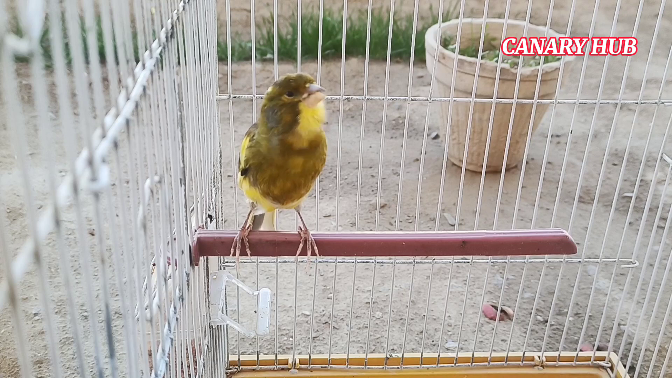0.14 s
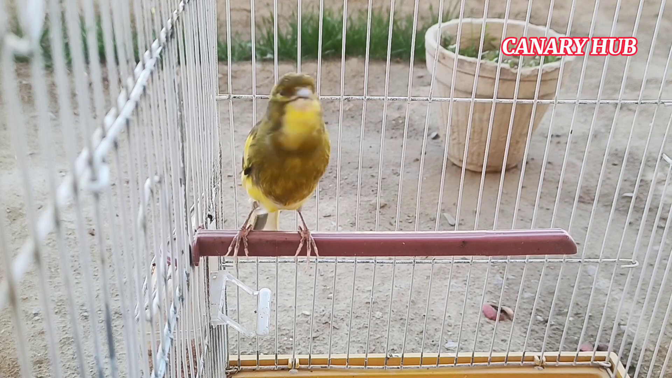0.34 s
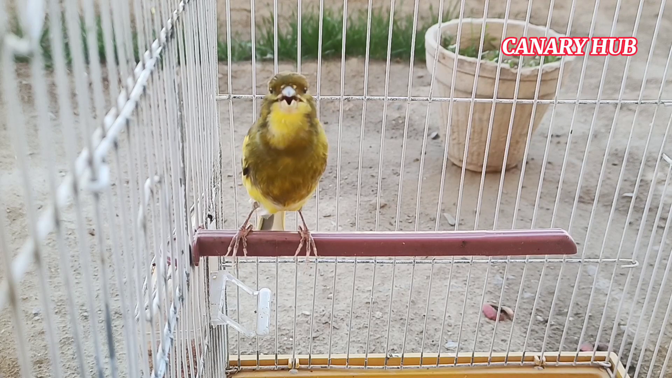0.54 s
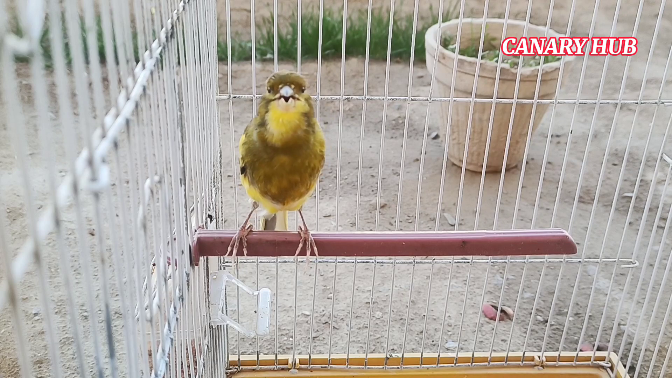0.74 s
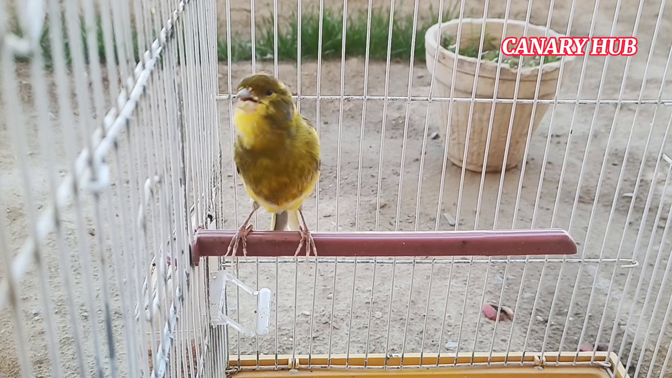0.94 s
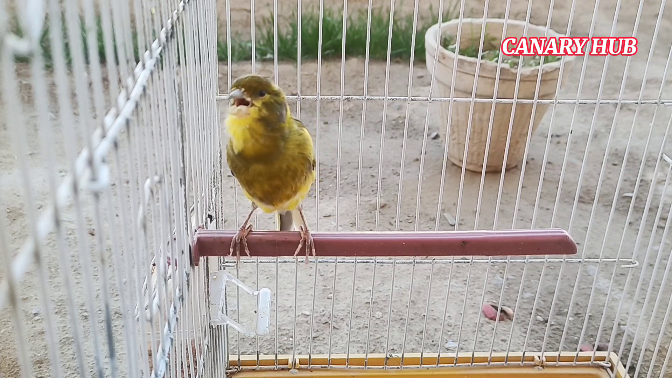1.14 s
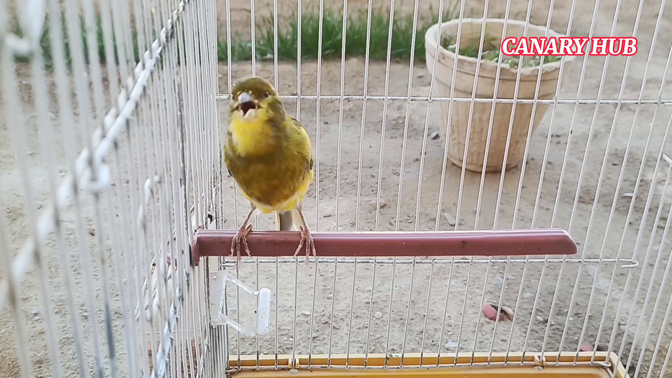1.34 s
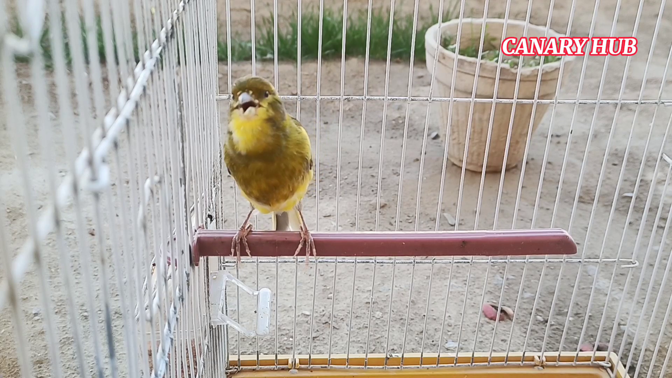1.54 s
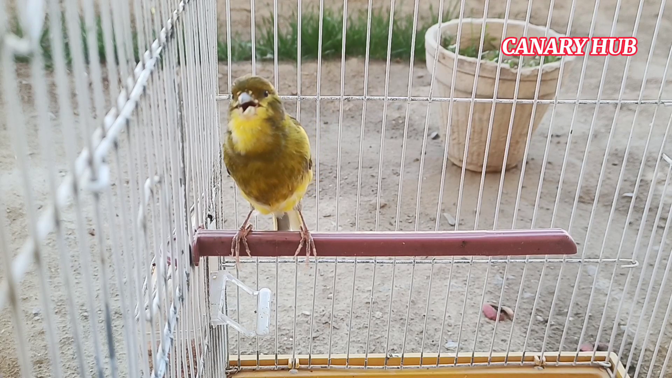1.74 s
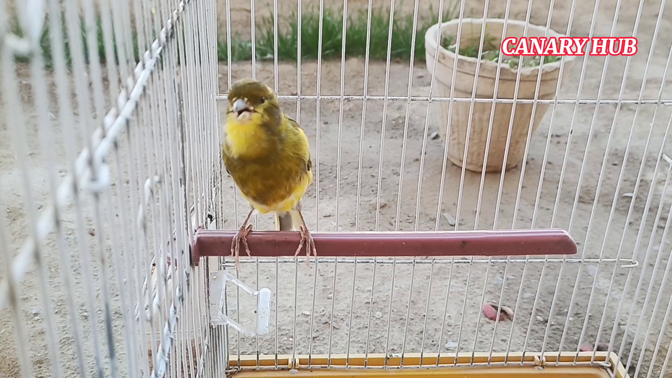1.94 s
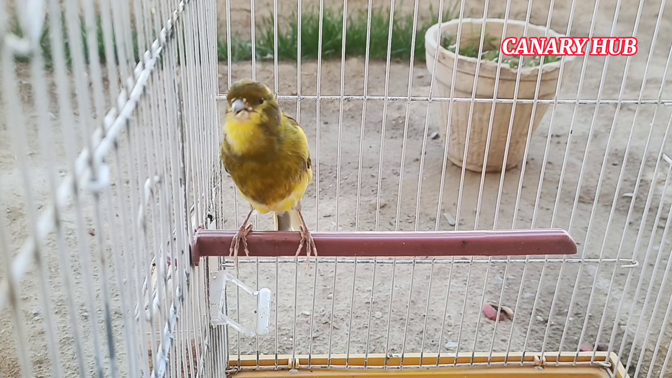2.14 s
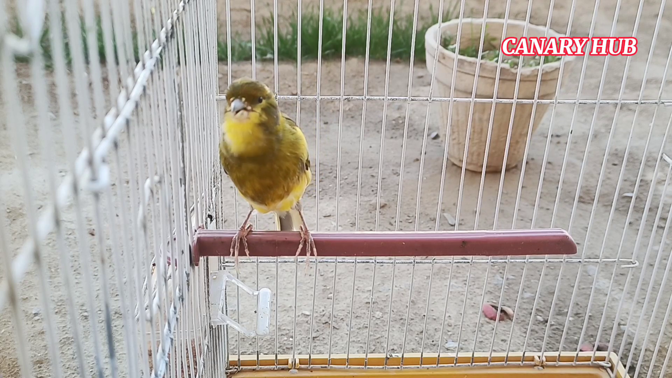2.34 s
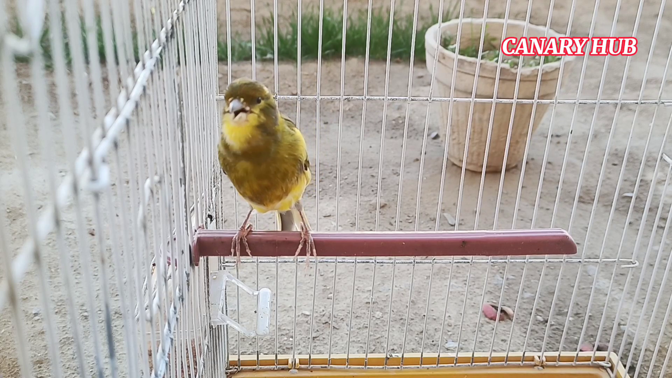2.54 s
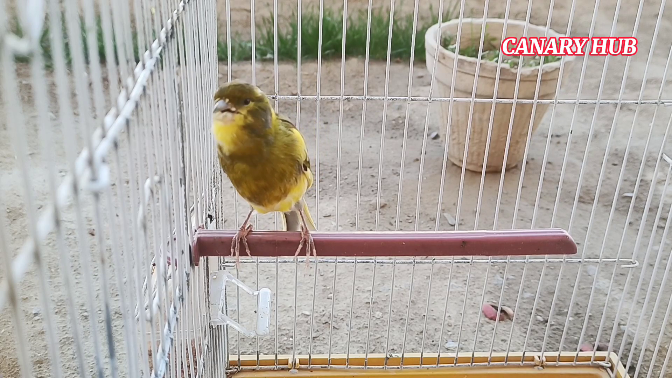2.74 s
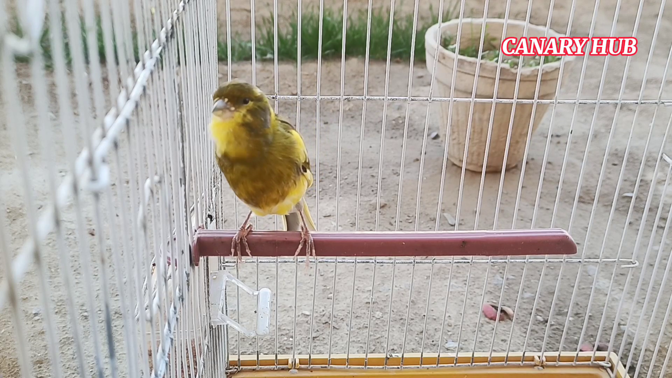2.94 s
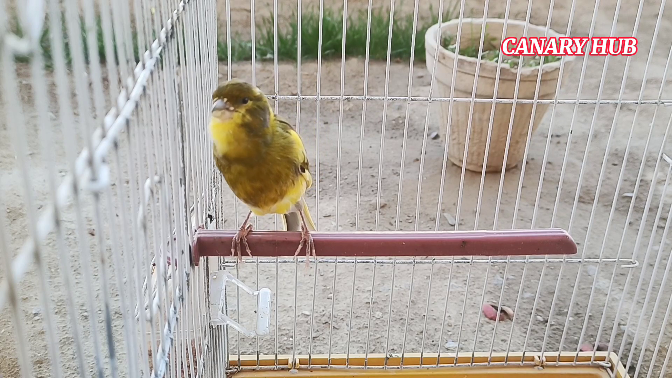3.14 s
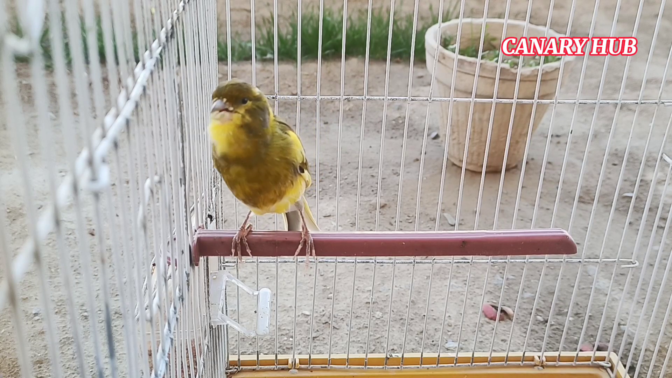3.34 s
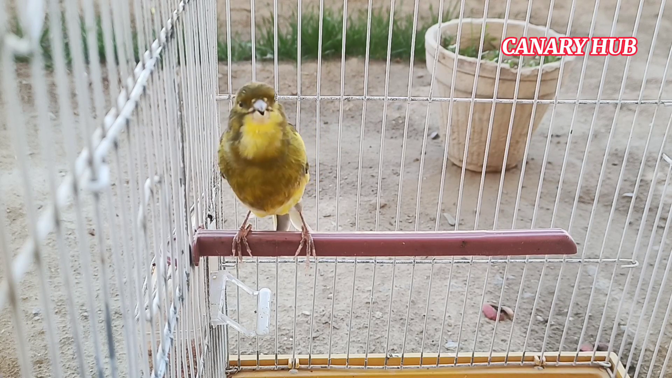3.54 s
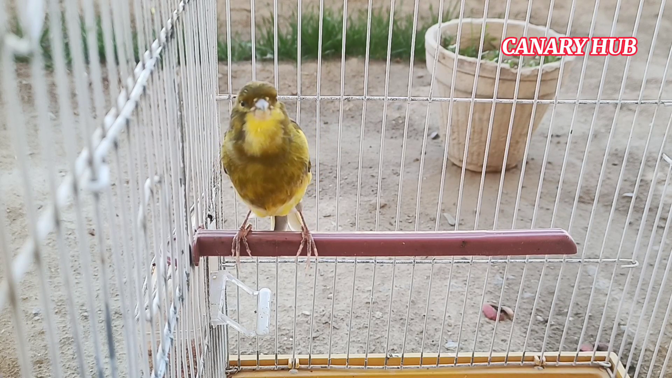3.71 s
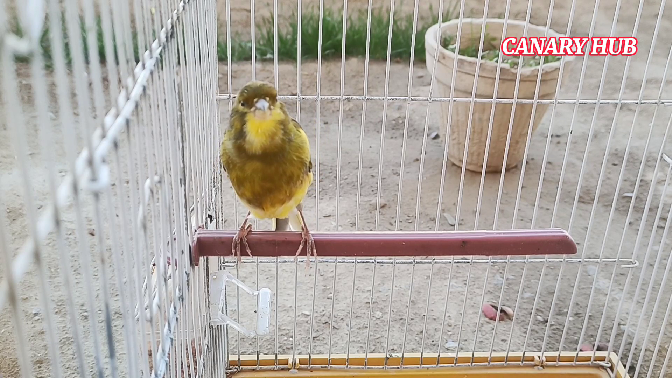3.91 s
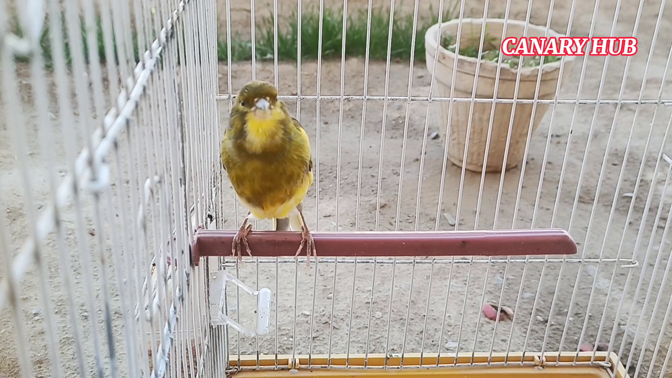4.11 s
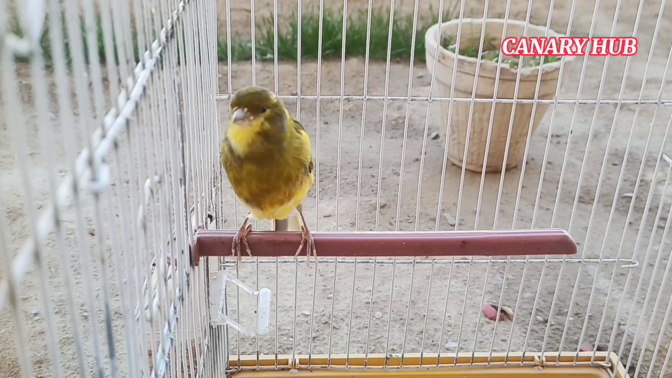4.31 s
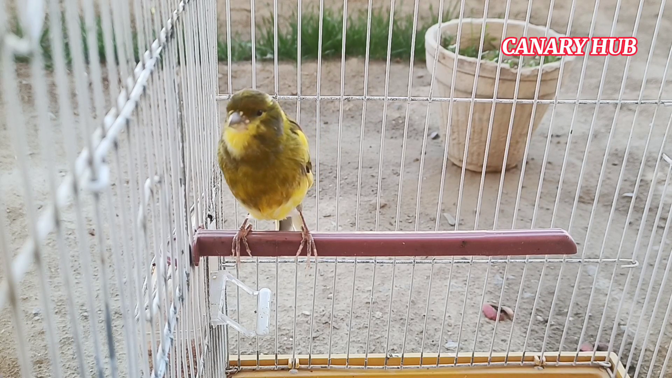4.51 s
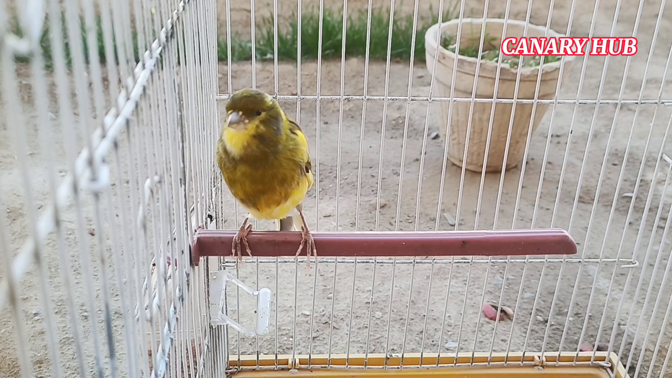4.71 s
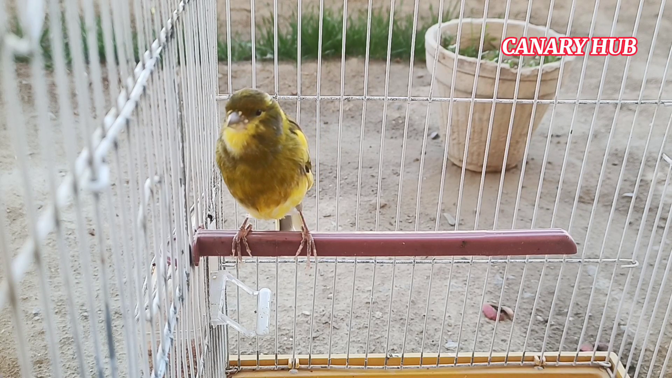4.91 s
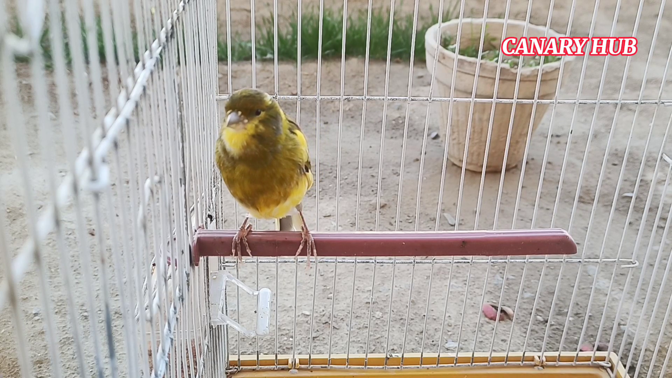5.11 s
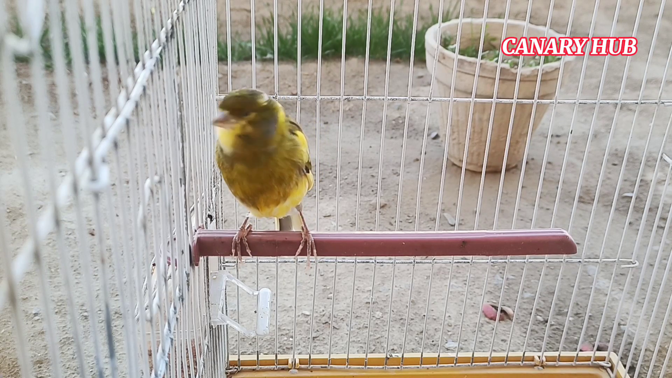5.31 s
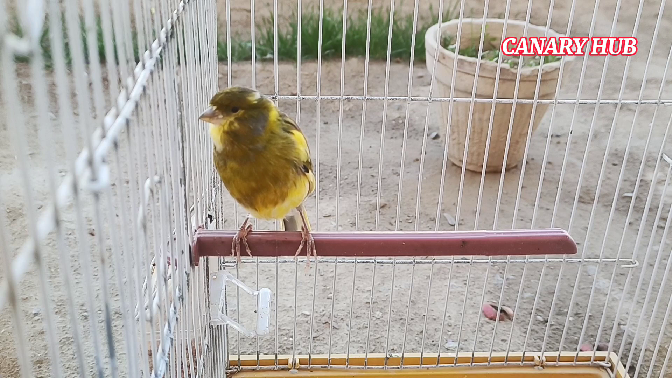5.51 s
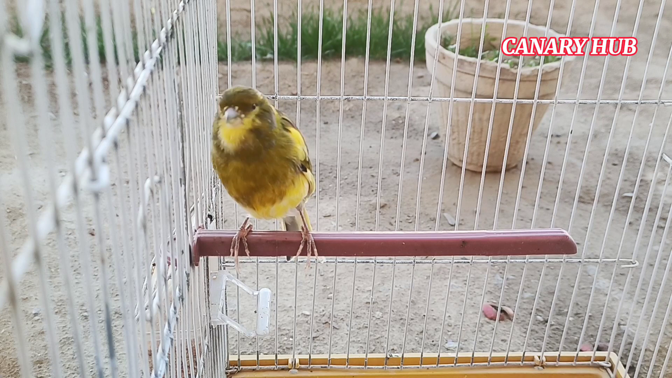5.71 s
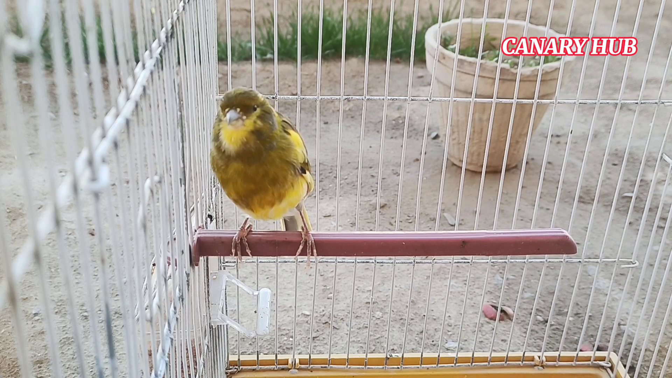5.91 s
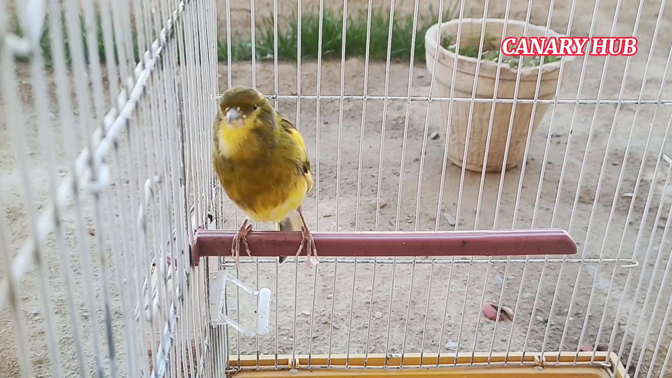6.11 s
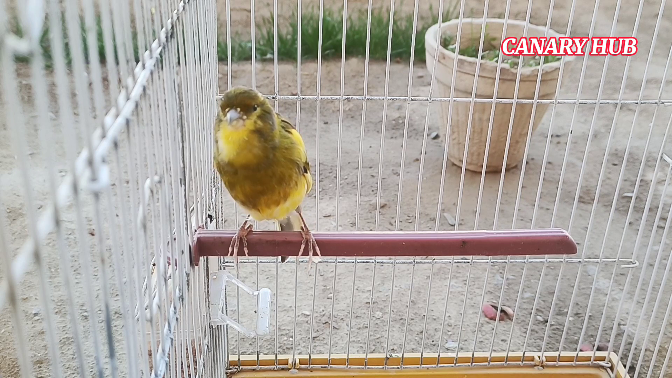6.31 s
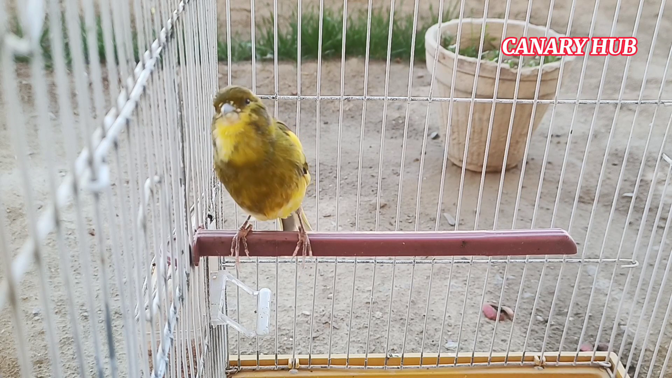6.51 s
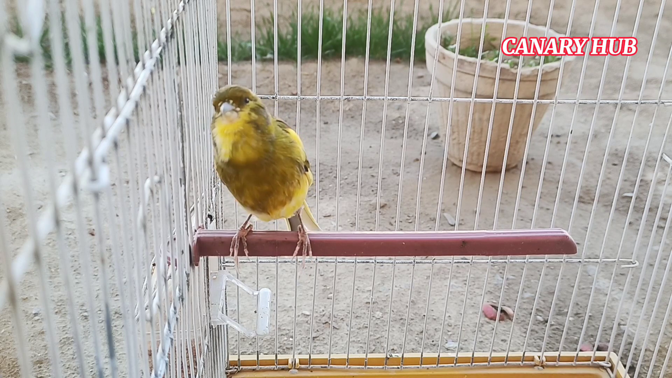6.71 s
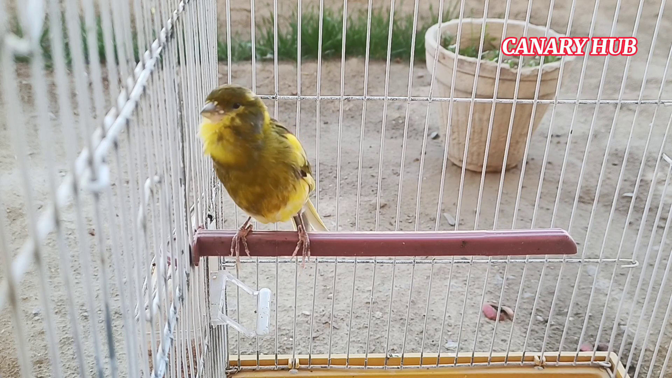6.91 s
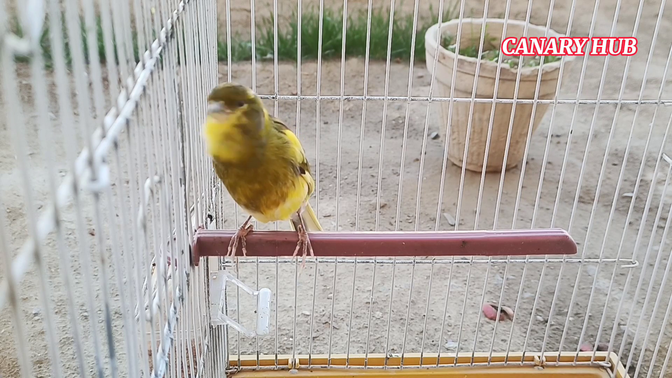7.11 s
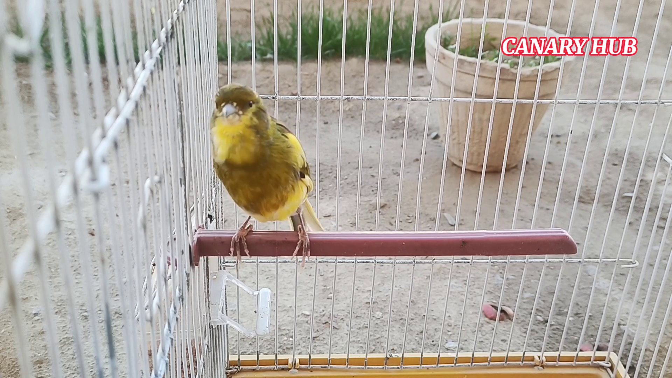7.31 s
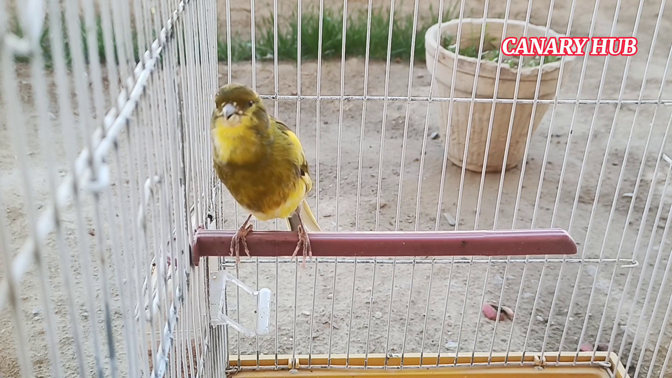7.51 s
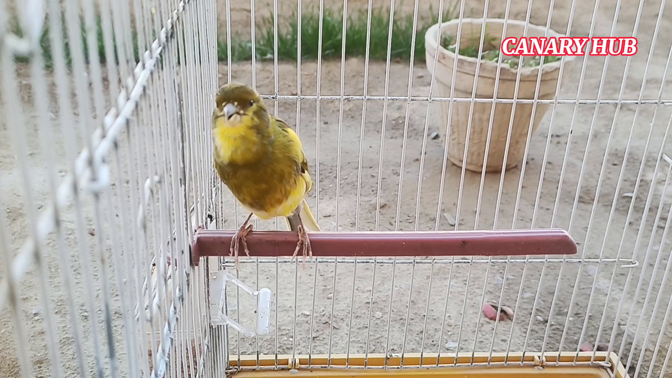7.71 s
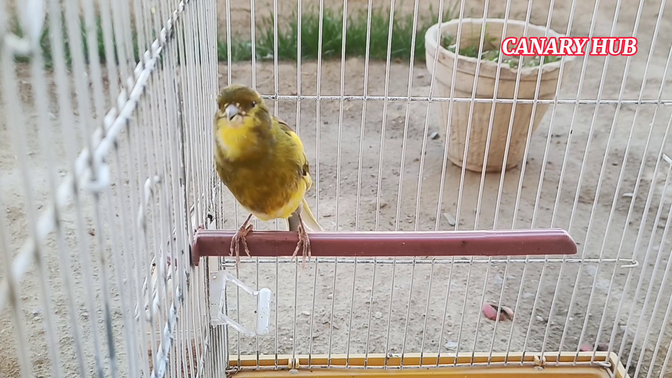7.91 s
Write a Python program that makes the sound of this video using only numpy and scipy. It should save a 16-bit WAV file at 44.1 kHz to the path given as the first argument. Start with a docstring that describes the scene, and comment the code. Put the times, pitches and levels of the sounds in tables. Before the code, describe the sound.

A caged canary sings loudly and close by in a yard with a soft echo, over a quiet, steady rumble of distant traffic. It opens with ten quick falling chirps, then four longer, high descending whistles from about 0.6 to 1.6 seconds. A run of short hooked notes follows, turning into wide upward sweeps from 2.3 to 2.9 seconds. A very fast trill of rising flicks lasts from 3.1 to 3.8 seconds. The canary then pauses, leaving the traffic and a far engine's low drone. Around 4.7 to 5 seconds a distant bird gives one faint buzzy call and four small chips, and the cage rustles very softly at about 5.6 seconds. At 6.2 seconds the canary starts a long, even trill that quickly grows loud and ends with one short, slightly sagging note near 7.9 seconds.

```python
"""A caged canary sings close by in a yard, over the steady rumble of distant traffic.
It opens with falling slurs and long whistles, then hooks, a rise, sweeps and a trill of quick flicks.
In the pause a far bird calls and the cage rustles; then the canary ends with a long trill and a sigh.
Each note is an almost pure gliding tone from the bird's voice box (the syrinx). A close reflection
weakens some of its pitches, and the yard adds a soft echo."""
import sys
import numpy as np
from scipy import signal
from scipy.fft import rfft, irfft, next_fast_len
from scipy.io import wavfile
from scipy.ndimage import uniform_filter1d, minimum_filter1d, map_coordinates

SR = 44100
rng = np.random.default_rng(int(sys.argv[2]) if len(sys.argv) > 2 else 0)


def inscribe(sig):
    """Save sig as 16-bit PCM at rate SR to the path in sys.argv[1].

    A 1-D sig is mono; a 2-D sig holds one channel per row.
    Samples are clipped to [-1, 1] before scaling.
    """
    pcm = np.round(np.clip(np.atleast_2d(sig).T, -1, 1) * 32767)
    wavfile.write(sys.argv[1], SR, pcm.astype(np.int16))


N = 350595
TIME = np.arange(N) / SR

# how the distant traffic swells and fades: (time [s], rumble level [dB], tyre level [dB])
TRAFFIC_LEVELS = [(0, -39, -46), (.6, -39, -48), (1.2, -46, -50), (2.1, -37, -49), (3.1, -36.5, -48.5),
                  (3.9, -40, -47.5), (5.2, -37.5, -46.5), (6.4, -40.5, -46.5), (7.1, -36, -44.5),
                  (7.95, -40, -45.5)]
# the tone colour of each sound, from low to high: (frequency [Hz], relative level [dB])
RUMBLE_COLOUR = [(15, -56), (25, -23.5), (56, -5), (130, 6), (149, 3), (199, -5), (237, -7), (263, -17),
                 (332, -13), (360, -15.5), (400, -23.5), (520, -43.5), (880, -120)]
TYRE_COLOUR = [(150, -31.5), (250, -3.5), (335, -7.5), (370, -15.5), (434, -8), (544, -14.5), (809, -11),
               (961, -15), (1950, -19.5), (3060, -27.5), (4800, -31), (6800, -34.5), (7700, -54),
               (16000, -66)]
EXHAUST_COLOUR = [(45, -13), (100, -4), (145, -1.5), (200, -5.5), (290, -4), (400, -10), (520, -8.5),
                  (650, -22)]
RUSTLE_COLOUR = [(1000, -20), (2500, 4), (4500, -6), (6500, 6), (8000, -17), (15000, -24)]
MIC_HISS_COLOUR = [(1000, -10), (13500, -11), (14700, -2), (15500, 0), (16500, -2.5)]
NOTE_HISS_COLOUR = [(1000, -26), (2500, 0.5), (5000, 6), (7000, 2), (9000, -12), (12500, -12), (15200, -3),
                    (16500, -10)]   # a faint high hiss on the notes, strongest on fast glides
OVERTONE_COLOUR = [(4000, 2.5), (7000, 9.5), (8500, -1.5), (11000, -2), (12500, -7.5), (14000, 2.5),
                   (15400, 8.5), (16500, 3)]   # how well the birds' overtones carry
# a far whine comes and goes: (time [s], level [dB])
WHINE_LEVELS = [(0, -72), (3.0, -66.5), (3.3, -50), (4.1, -46), (4.5, -59), (7.95, -60)]
WHINE_HZ, WHINE_WIDTH_HZ = 804, 90
# a far engine: (time [s], firing rate [Hz], level [dB])
ENGINE_RUN = [(0, 43, -56), (1.2, 41, -57.5), (2.1, 47, -49.5), (4.7, 48.5, -44), (6.3, 47.5, -45),
              (7.95, 48, -47)]
# a brief hum from far off: (peak time [s], half-width [s], pitch [Hz], level [dB])
LOW_HUMS = [(2.095, 0.026, 385, -37.5)]
# faint rustles in the cage: (peak time [s], half-width [s], level [dB])
RUSTLES = [(5.59, 0.023, -59), (5.665, 0.017, -54.5)]
# the background dips briefly after a phrase: (time [s], depth [dB], recovery time [s])
LULLS = [(.617, -10, .05), (.836, -4.5, .05), (1.095, -5, .05), (1.345, -3, .05), (2.238, -8, .07),
         (2.897, -12.5, .07), (3.838, -9, .06)]

# the overtones of each voice: (multiple of the pitch, relative level [dB])
FAR_CALL_OVERTONES = [(2, -4.5), (3, -33)]
FAR_CHIP_OVERTONES = [(2, -33.5)]
CANARY_OVERTONES = [(2, -43.5), (3, -40.5), (4, -44.5)]
# note shapes: (share of the note's length [0-1], pitch [Hz], relative level [dB])
FAR_CALL_SHAPE = [(0, 2864, -12), (.15, 2986, 0), (.45, 3124, 2.5), (.7, 3320, -2.5), (.86, 3220, -5),
                  (1, 2700, -14)]   # a low arch
FAR_CHIP_SHAPE = [(0, 3180, -21), (.25, 4100, -4), (.5, 4320, 0), (.75, 4050, -6.5), (1, 3340, -18)]   # a steeper arch
THIN_SHAPE = [(0, 4730, -13.5), (.2, 4680, -2), (1, 4630, -16)]   # sinks slightly
HOOK_SHAPE = [(0, 3650, -30), (.07, 4100, -6), (.2, 4580, -3), (.4, 5020, -6.5), (.62, 5250, -10),
              (.79, 5400, -11), (.87, 5000, -.5), (.94, 4640, -9), (1, 4700, -30)]   # rises, crests and snaps down
RISE_SHAPE = [(0.0, 3690, -34.5), (0.06, 3850.0, -12), (0.2, 4650, -10.5), (0.33, 4910.0, -10.5),
              (0.45, 6090.0, -27.5), (0.61, 6910.0, -18.5), (0.82, 7010.0, -5.5), (0.94, 7440.0, -17),
              (1.0, 7460.0, -26.5)]   # climbs an octave
SWEEP_SHAPE = [(0, 2150, -24), (.06, 2980, -13), (.15, 3830, -2.5), (.26, 4470, -7), (.48, 5120, -14),
               (.61, 5900, -7), (.8, 6150, -4), (.92, 6350, -6), (1, 6480, -22)]   # climbs an octave and a half
FLICK_SHAPE = [(0, 1900, -35), (.15, 2500, -27), (.3, 3450, -11), (.46, 3770, -5), (.61, 4320, -1),
               (.75, 4830, -8), (.88, 4940, -2), (1, 4940, -27)]   # shoots up and catches at its top
SIGH_SHAPE = [(0.0, 3000, -29), (0.14, 3490, -20), (0.32, 3586, -9.5), (0.5, 3420.0, -9),
              (0.71, 3280.0, -8), (1.0, 3370, -16)]   # lifts, then sags
# when those shapes are sung: (start [s], length [s], pitch factor, level [dB])
FAR_CHIPS = [(4.816, 0.024, 0.9, -36.5), (4.889, 0.026, 1.0, -35.5), (4.958, .027, .98, -34),
             (5.03, 0.025, 1, -36.5)]
THIN_NOTES = [(6.187, .075, 0.98, -52), (7.49, 0.48, .905, -45.5)]
FAR_CALL_NOTE = (4.697, 0.093, 1.0, -38)
RISE_NOTE = (2.2933, 0.07, 1.0, -11)
SIGH_NOTE = (7.887, 0.0516, 1.003, -1)

# the canary's falling slurs: (start [s], length [s], end pitch [Hz], level [dB])
SLURS = [(-0.031, .034, 2980, -6), (.0307, .034, 3020, -7.5), (.0953, .034, 3020, -7.5),
         (.1585, .034, 3020, -7), (.2225, .035, 3010, -7), (.2888, .034, 3000, -7),
         (.3535, .034, 2980, -6.5), (.4165, .034, 2900, -6.5), (.4825, .034, 2860, -6.5),
         (.552, .04, 3280, -10)]
SLUR_TOP_HZ, SLUR_FALL_SHARE = 4790, .9   # the pitch rests once it has fallen
# its long whistles: (start [s], length [s], settled pitch [Hz], settling time [s])
WHISTLES = [(.6325, .17, 4440, .041), (.8605, .2, 4310, .0523), (1.1251, .207, 4214, .0529),
            (1.3935, .169, 3990, .061)]
WHISTLE_TOP_HZ, WHISTLE_DB = 8000, -7
# its hooks: (start [s], length [s], level [dB], extra lift at the crest [Hz])
HOOKS = [(1.6405, .049, -13, 600), (1.7178, .0462, -8, 1300), (1.7872, .0487, -7, 1400),
         (1.86, .0481, -6, 750), (1.9374, .047, -6, 600), (2.012, .048, -4, 150), (2.0872, .049, -7.5, 200),
         (2.1585, .047, -9, 650)]
# its sweeps: (start [s], length [s], level [dB], upturn at the end [Hz])
SWEEPS = [(2.3795, .066, -8, 900), (2.4643, .069, -8.5, 900), (2.5506, .064, -7, 800),
          (2.6338, .068, -7, 800), (2.7204, .064, -7, 800), (2.8033, .063, -9, 100)]
# its first trill, made of flicks: (start [s], level [dB])
FLICKS = [(3.0806, -13.1), (3.1284, -8.6), (3.1718, -7.2), (3.2184, -6.5), (3.2676, -7.0), (3.3159, -6.6),
          (3.3647, -6.4), (3.414, -5.6), (3.464, -6.0), (3.5144, -5.8), (3.564, -5.8), (3.6147, -6.2),
          (3.6653, -6.3), (3.7173, -8.7), (3.7731, -8.4)]
FLICK_S, FLICK_UPTURN_HZ, FLICK_UPTURN_FADE_S = .033, 1100, .17
# its long trill: (start [s], level [dB])
TRILL_NOTES = [(6.2168, -25.5), (6.2922, -17.5), (6.3622, -14.2), (6.4311, -10.1), (6.4997, -11.8),
               (6.568, -10.4), (6.6361, -10.8), (6.7044, -8.6), (6.7736, -9.0), (6.8407, -8.4),
               (6.91, -9.0), (6.9789, -8.1), (7.0436, -10.1), (7.1091, -9.1), (7.1758, -9.7),
               (7.2417, -8.1), (7.309, -7.6), (7.3762, -7.9), (7.4414, -7.4), (7.5037, -7.5), (7.566, -7.7),
               (7.6273, -7.7), (7.6884, -8.0), (7.7491, -7.8), (7.8126, -8.5)]
TRILL_S, TRILL_LOW_HZ, TRILL_TOP_HZ = .046, 2050, 3815
TRILL_CLIMB_HZ_PER_S, TRILL_BEND_HZ = 82000, 260
# the close reflection's delay changes as the bird turns: (time [s], delay [ms])
REFLECTION_LAG = [(0, 1.4), (.6, 1.38), (1.4, 1.38), (1.64, 1.346), (2.8, 1.345), (3.1, 1.31), (7.9, 1.31)]
REFLECTION_SHARE = .56

HISSY_GLIDE_HZ_PER_S = 42000   # glides this fast carry the most hiss
OVERTONE_GROWTH = 0.45   # extra dB of overtones for each dB of loudness
LOW_OPENING_HZ = 3750   # below this pitch a trill note is in its low opening
ATTACK_CURVE = 1.5   # above 1: a note swells fast at first, then eases into its peak
PITCH_SCATTER = .005   # from one repeat of a note to the next
CUTOFF_HZ = 15900


def from_db(db):
    """Turn decibels into a factor to multiply by."""
    return 10 ** (np.asarray(db) / 20)


def rms_one(x):
    """Scale a sound so that its average power is 1."""
    return x / np.sqrt(np.mean(x ** 2) + 1e-20)


def in_time(rows):
    """Fill in each column of a timed table for every sample."""
    times, *columns = np.transpose(rows)
    return [np.interp(TIME, times, column) for column in columns]


def at_hz(colour, hz):
    """Look up a colour table's level in dB, with octaves evenly spaced."""
    frequencies, db = np.transpose(colour)
    return np.interp(np.log(np.maximum(hz, 1)), np.log(frequencies), db)


def drift(rate):
    """A smooth random wobble of about size 1, changing about `rate` times a second."""
    smooth = signal.butter(2, min(rate, SR / 4), fs=SR, output="sos")
    return rms_one(signal.sosfilt(smooth, rng.standard_normal(N + SR))[SR:])


def noise(colour):
    """Noise with the given tone colour and a power of 1."""
    size = next_fast_len(N)
    gains = from_db(at_hz(colour, np.fft.rfftfreq(size, 1 / SR)))
    return rms_one(irfft(rfft(rng.standard_normal(size)) * gains, size)[:N])


def bump(x, centre, half_width):
    """A smooth bell shape that reaches 1 at its centre."""
    return np.exp(-((x - centre) / half_width) ** 2)


def delayed(x, lag_ms):
    """The same sound, arriving later by a longer path."""
    return map_coordinates(x, [np.arange(N) - lag_ms * SR / 1000], order=5)


def traffic(rumble_gain_db, tyre_gain_db, lumpy_db):
    """Engines rumble, tyres swish and a thin whine rings on a far road."""
    rumble_db, tyre_db = in_time(TRAFFIC_LEVELS)
    whine_db, = in_time(WHINE_LEVELS)
    rumble = noise(RUMBLE_COLOUR) * from_db(rumble_db + rumble_gain_db + lumpy_db * drift(12))
    tyres = noise(TYRE_COLOUR) * from_db(tyre_db + tyre_gain_db)
    ringing = signal.iirpeak(WHINE_HZ, WHINE_HZ / WHINE_WIDTH_HZ, fs=SR)
    whine = rms_one(signal.lfilter(*ringing, rng.standard_normal(N))) * from_db(whine_db)
    return rumble + tyres + whine


def engine(wander, fade_db):
    """An engine drones at multiples of its firing rate; each fades in and out on its long way here."""
    firing_hz, level_db = in_time(ENGINE_RUN)
    phase = 2 * np.pi * np.cumsum(firing_hz * (1 + wander * drift(2))) / SR
    drone = np.zeros(N)
    for k in range(1, 13):
        gain = from_db(at_hz(EXHAUST_COLOUR, k * firing_hz) + fade_db * drift(3.6))
        drone += gain * np.sin(k * phase + rng.uniform(0, 2 * np.pi))
    return rms_one(drone) * from_db(level_db)


def low_hums():
    """A low tone swells and fades in about a tenth of a second."""
    return sum(from_db(db) * bump(TIME, peak_s, half_width) * np.sin(2 * np.pi * hz * TIME)
               for peak_s, half_width, hz, db in LOW_HUMS)


def rustles():
    """The cage rustles in short, soft swells of bright noise."""
    swells = sum(from_db(db) * bump(TIME, peak_s, half_width) for peak_s, half_width, db in RUSTLES)
    return noise(RUSTLE_COLOUR) * swells


def lulls():
    """The background's volume: it drops quickly, then swells back."""
    db = sum(depth_db * (TIME > start) * np.exp(-np.abs(TIME - start) / recovery)
             for start, depth_db, recovery in LULLS)
    return from_db(uniform_filter1d(db, size=128))


def yard_echo(x, early_s, late_s, late_db, gap_s, dull_hz):
    """Cage, ground and walls scatter a duller echo; early_s and late_s are times to fade by 60 dB."""
    t = TIME[:SR]
    decay = (from_db(-60 * t / early_s) + from_db(late_db - 60 * t / late_s)) * (t > gap_s)
    response = rng.standard_normal(SR) * decay
    echo = signal.fftconvolve(x, response / np.linalg.norm(response))[:N]
    return signal.sosfilt(signal.butter(1, dull_hz, fs=SR, output="sos"), echo)


def note_time(length):
    """Seconds since the start of a note."""
    return np.arange(int(length * SR)) / SR


def shaped(shape, start, length, pitch_factor, level_db):
    """Stretch a shape into a note (start, pitches, levels); muscles round off each turn of pitch."""
    share, hz, db = np.transpose(shape)
    progress = note_time(length) / length
    glide_hz = uniform_filter1d(np.interp(progress, share, hz), len(progress) // 20 + 1)
    return start, pitch_factor * glide_hz, level_db + np.interp(progress, share, db)


def voice_box(notes, overtones, waver, waver_hz, flutter_db, hiss_db):
    """A bird sings each note as one trembling, gliding tone with overtones; a faint hiss lies on it."""
    song = np.zeros(N)
    tremble = 1 + waver * drift(waver_hz)
    flutter = flutter_db * drift(190)
    hiss = from_db(hiss_db) * noise(NOTE_HISS_COLOUR)
    loudest_db = max(db.max() for start, hz, db in notes)
    for start, glide_hz, level_db in notes:
        at = int(start * SR) + np.arange(len(glide_hz))
        soft_edges = signal.windows.tukey(len(at), .005 * SR / len(at))
        inside = (at >= 0) & (at < N)
        at, glide_hz = at[inside], glide_hz[inside]
        hz = glide_hz * tremble[at]
        phase = 2 * np.pi * np.cumsum(hz) / SR
        loud_db = level_db[inside] + flutter[at]
        # fast glides hiss a little, held notes are pure
        hiss_share = np.minimum(np.abs(np.gradient(glide_hz)) * SR / HISSY_GLIDE_HZ_PER_S, 1)
        tone = np.sin(phase) + hiss_share * hiss[at]
        # the harder the bird pushes, the richer the tone
        push_db = OVERTONE_GROWTH * np.maximum(loud_db - loudest_db, -14)
        for k, db in overtones:
            gain = from_db(db + push_db + at_hz(OVERTONE_COLOUR, k * hz) + rng.normal(0, 1.6))
            tone += gain * np.sin(k * phase) * (k * hz < SR / 2)
        song[at] += soft_edges[inside] * tone * from_db(loud_db)
    return song


def far_bird():
    """A far bird gives one buzzy call and four small chips; later two faint, thin notes sound, the first just
    before the long trill."""
    call = voice_box([shaped(FAR_CALL_SHAPE, *FAR_CALL_NOTE)], FAR_CALL_OVERTONES,
                     waver=0.015, waver_hz=500, flutter_db=1.5, hiss_db=-50)
    chips = [shaped(FAR_CHIP_SHAPE, *row) for row in FAR_CHIPS]
    thin_notes = [shaped(THIN_SHAPE, *row) for row in THIN_NOTES]
    return call + voice_box(chips + thin_notes, FAR_CHIP_OVERTONES,
                            waver=.004, waver_hz=300, flutter_db=0.7, hiss_db=-40)


def swell(t, attack_s, rise_db, release_s, fall_db):
    """A note's level in dB as it grows and dies away."""
    rising = np.clip(1 - t / attack_s, 0, 1) ** ATTACK_CURVE
    falling = np.clip(1 - (t[-1] - t) / release_s, 0, 1) ** 2
    return -rise_db * rising - fall_db * falling


def warm_up(hz, sung_s, weak_db, db_per_s):
    """Extra dB for a note's low opening: weak early in a trill, stronger as the trill goes on."""
    lowness = np.clip((LOW_OPENING_HZ - hz) / 400, 0, 1)
    return lowness * (weak_db + db_per_s * sung_s)


def lifted(note, lift_hz, at_share, width_share, dim_db_per_hz):
    """The pitch jumps up briefly at one point of a note, which thins the tone."""
    start, hz, db = note
    lift = lift_hz * bump(np.linspace(0, 1, len(hz)), at_share, width_share)
    return start, hz + lift, db - dim_db_per_hz * lift


def slurs():
    """Straight falling glides, loudest in the middle, that rest briefly on their last pitch."""
    for start, length, end_hz, level_db in SLURS:
        t = note_time(length)
        fallen = np.minimum(t / (SLUR_FALL_SHARE * length), 1)
        hz = SLUR_TOP_HZ + (end_hz - SLUR_TOP_HZ) * fallen
        yield start, hz, level_db + swell(t, attack_s=.02, rise_db=14, release_s=.03, fall_db=7)


def whistles():
    """Long falling glides that swell as their pitch settles."""
    for start, length, settled_hz, settling_s in WHISTLES:
        t = note_time(length)
        hz = settled_hz + (WHISTLE_TOP_HZ - settled_hz) * np.exp(-t / settling_s)
        yield start, hz, WHISTLE_DB + swell(t, attack_s=.08, rise_db=37, release_s=.048, fall_db=15)


def hooks():
    """Notes that rise to crests of varying height and snap down."""
    for start, length, level_db, crest_hz in HOOKS:
        note = shaped(HOOK_SHAPE, start, length, 1, level_db)
        yield lifted(note, crest_hz, at_share=.77, width_share=.075, dim_db_per_hz=.007)


def sweeps():
    """Wide upward glides that turn up at the end."""
    for start, length, level_db, upturn_hz in SWEEPS:
        note = shaped(SWEEP_SHAPE, start, length, 1, level_db)
        yield lifted(note, upturn_hz, at_share=1, width_share=.06, dim_db_per_hz=.002)


def flicks():
    """Quick upward glides, about twenty a second; the first few turn up at the end."""
    for start, level_db in FLICKS:
        sung_s = start - FLICKS[0][0]
        start, hz, db = shaped(FLICK_SHAPE, start, FLICK_S, rng.normal(1, PITCH_SCATTER), level_db)
        note = start, hz, db + warm_up(hz, sung_s, weak_db=-8, db_per_s=15)
        upturn_hz = FLICK_UPTURN_HZ * np.exp(-sung_s / FLICK_UPTURN_FADE_S)
        yield lifted(note, upturn_hz, at_share=1, width_share=.09, dim_db_per_hz=.003)


def long_trill():
    """Each note climbs steadily, then bends over and holds its top pitch."""
    t = note_time(TRILL_S)
    below_top = TRILL_TOP_HZ - TRILL_LOW_HZ - TRILL_CLIMB_HZ_PER_S * t
    hz = TRILL_TOP_HZ - TRILL_BEND_HZ * np.logaddexp(0, below_top / TRILL_BEND_HZ)
    swell_db = swell(t, attack_s=.033, rise_db=29, release_s=.015, fall_db=19)
    for start, level_db in TRILL_NOTES:
        opening_db = warm_up(hz, start - TRILL_NOTES[0][0], weak_db=-12, db_per_s=10.5)
        yield start, hz * rng.normal(1, PITCH_SCATTER), level_db + swell_db + opening_db


def canary():
    """The song plus a close reflection, which partly cancels it about every 750 Hz, so glides pulse."""
    notes = [*slurs(), *whistles(), *hooks(), shaped(RISE_SHAPE, *RISE_NOTE), *sweeps(),
             *flicks(), *long_trill(), shaped(SIGH_SHAPE, *SIGH_NOTE)]
    song = voice_box(notes, CANARY_OVERTONES, waver=.0016, waver_hz=130, flutter_db=0.6, hiss_db=-41)
    lag_ms, = in_time(REFLECTION_LAG)
    return song + REFLECTION_SHARE * delayed(song, lag_ms)


def scene():
    """The near canary over its echoes, the far bird, the traffic and the microphone's hiss."""
    near, far = canary(), far_bird()
    near_echo = yard_echo(near, early_s=.14, late_s=.34, late_db=-20, gap_s=.0013, dull_hz=6000)
    wall_echo = delayed(near, lag_ms=29)
    far_echo = yard_echo(far, early_s=.13, late_s=.52, late_db=-17, gap_s=.0052, dull_hz=8960)
    echoes = from_db(-14.5) * near_echo + from_db(-28.5) * wall_echo + from_db(-4.5) * far_echo
    road = traffic(rumble_gain_db=-0.5, tyre_gain_db=0.5, lumpy_db=1.0)
    road += engine(wander=0.01172, fade_db=6.0)
    hiss = from_db(-80) * noise(MIC_HISS_COLOUR)
    background = echoes + far + road + rustles() + low_hums() + hiss
    return (near + lulls() * background)[None]


def limiter(x, ceiling_db, hold_s):
    """Turn the volume down smoothly around peaks that pass the ceiling."""
    width = int(hold_s * SR)
    gain = np.minimum(1, from_db(ceiling_db) / (np.abs(x) + 1e-9))
    return x * uniform_filter1d(minimum_filter1d(gain, width), width)


def record(dry):
    """Hold down the loudest peaks and cut off the highest treble."""
    limited = limiter(dry, ceiling_db=-4.5, hold_s=.004)
    return signal.sosfilt(signal.ellip(10, .1, 80, CUTOFF_HZ, fs=SR, output="sos"), limited)


dry = scene()
out = record(dry)
inscribe(out)
```